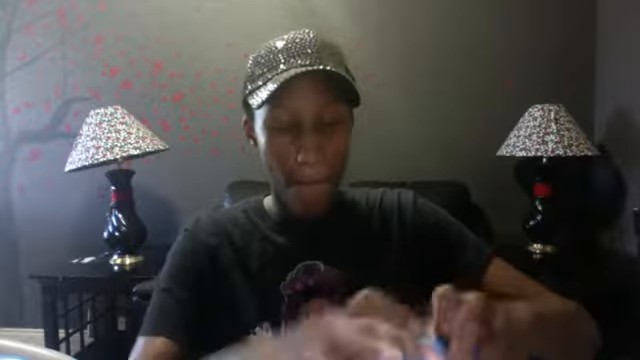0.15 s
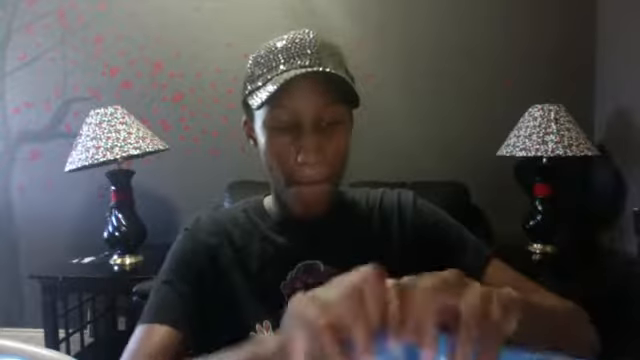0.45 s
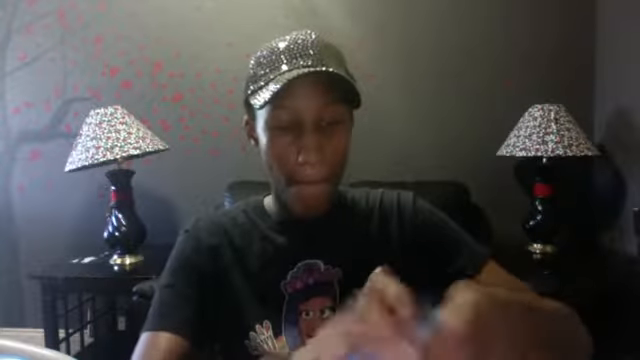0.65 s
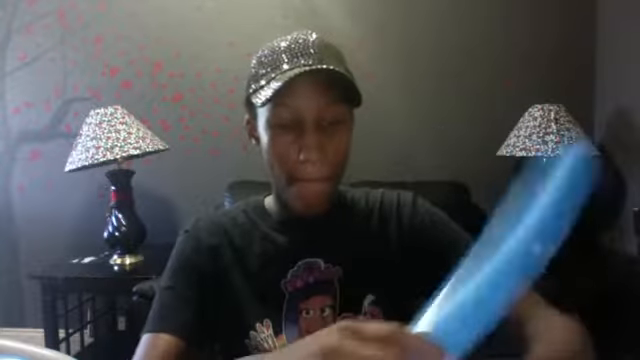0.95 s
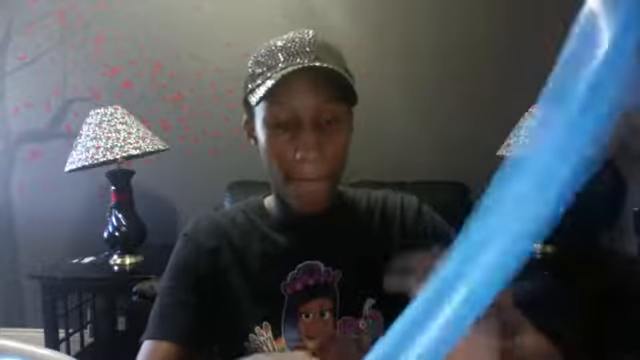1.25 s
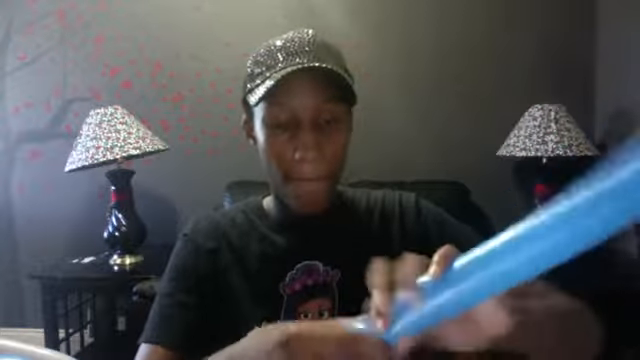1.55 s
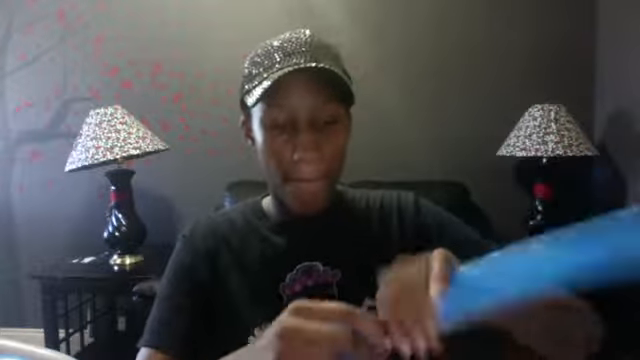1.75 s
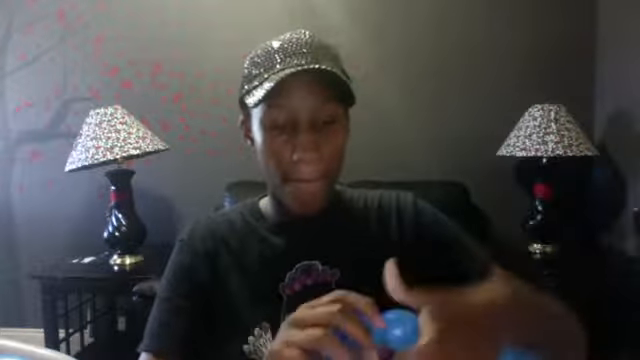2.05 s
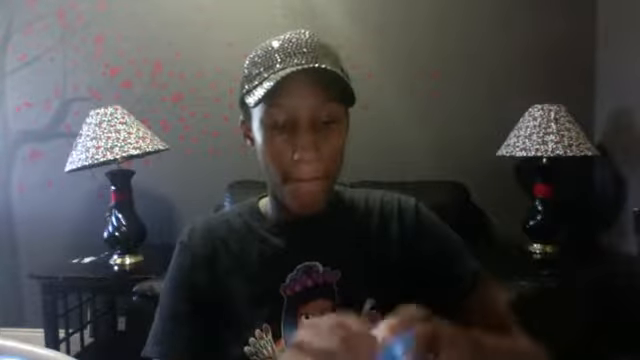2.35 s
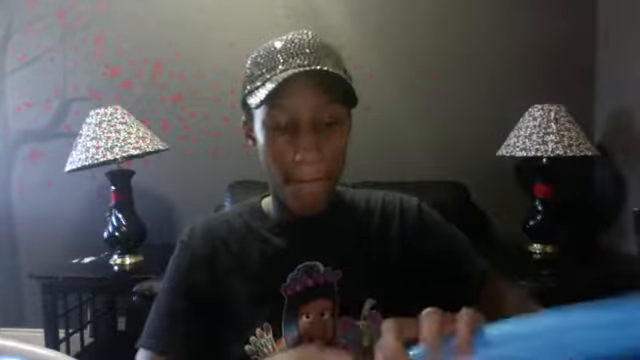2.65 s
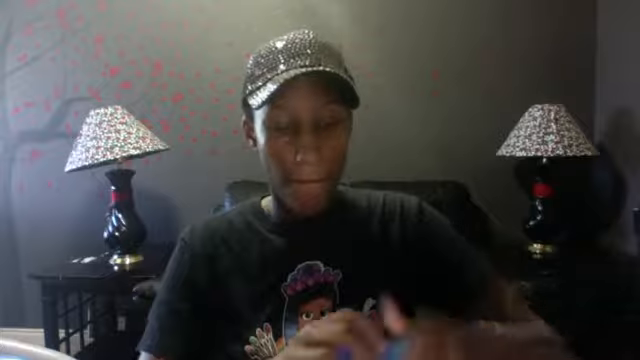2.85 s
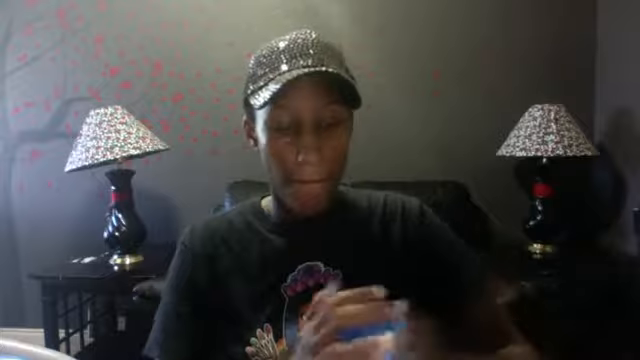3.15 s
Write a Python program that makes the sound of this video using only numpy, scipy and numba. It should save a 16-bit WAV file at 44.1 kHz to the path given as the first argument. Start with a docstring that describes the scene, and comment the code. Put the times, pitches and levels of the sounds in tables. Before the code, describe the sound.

Latex balloon being twisted by hand, with rubbery squeaks, creaks and sharp snaps in a small room.

```python
"""In a small room, a long latex balloon is squeezed and twisted by hand close to a microphone.
Fingers stick and slip on the rubber: each slip cracks, shakes the taut skin and rings the air inside.
Pulse trains drive coloured filters and resonances for the rubs and for sudden snaps of release.
Now and then the slips lock into a short gliding squeal, made of a sine and three overtones.
Changing room reflections surround the balloon, over a faint steady noise."""
import sys
import numpy as np
from scipy import signal
from scipy.fft import rfft, irfft
from scipy.io import wavfile
from scipy.ndimage import uniform_filter1d, minimum_filter1d, map_coordinates
from numba import njit

SR = 44100
rng = np.random.default_rng(int(sys.argv[2]) if len(sys.argv) > 2 else 0)


def generate_wav(sig):
    """Save sig (samples, or channels by samples) to the path in sys.argv[1] as 16-bit PCM at SR."""
    pcm = np.round(np.clip(np.atleast_2d(sig).T, -1, 1) * 32767).astype(np.int16)
    wavfile.write(sys.argv[1], SR, pcm)


N = 145530  # samples, 3.3 s


def undb(db):
    """Decibels to amplitude ratio: 20 dB is a factor of ten."""
    return 10 ** (np.asarray(db) / 20)


def unit(h):
    """Energy normalisation: the squares sum to 1."""
    return h / np.sqrt(np.sum(h ** 2))


def through(x, h):
    """Linear filtering: convolution with a response, cut to the input's length."""
    return signal.fftconvolve(x, h)[:len(x)]


def walk(n, hz):
    """Band-limited chance: straight lines between normal draws, hz per second, with a spread near 1."""
    count = 1000
    knots = rng.standard_normal(count)
    return np.sqrt(3 / 2) * np.interp(np.arange(n) * hz / SR, np.arange(count), knots)


def colour(points):
    """Minimum phase: folding the cepstrum gives a causal response with the given (Hz, dB) shape."""
    hz, db = np.array(points, float).T
    size = 2048
    bins_hz = np.arange(size // 2 + 1) * SR / size
    gain = undb(np.interp(np.log(bins_hz + 1), np.log(hz), db))
    cepstrum = irfft(np.log(gain))
    cepstrum[1:size // 2] *= 2
    cepstrum[size // 2 + 1:] = 0
    return unit(irfft(np.exp(rfft(cepstrum))))


def add(out, start, x):
    """Superposition: mix x into out from start in seconds, cut at the end of the scene."""
    i = max(int(start * SR), 0)
    out[..., i:i + x.shape[-1]] += x[..., :max(N - i, 0)]


RATE_WANDER, WANDER_HZ, SLIP_JITTER = 0.3, 70.1, 0.13  # spreads of the log slip rate
SLIP_SCATTER_DB = 0.5
TEAR_S, TEAR_SHARE = 0.00076, 0.78  # hiss of the contact after each slip


def slips(n, rate):
    """Stick-slip friction: uneven pulses at a wandering rate, each trailed by a tiny hiss; rms near 1."""
    hz = rate * np.exp(RATE_WANDER * walk(n, WANDER_HZ) + SLIP_JITTER * walk(n, rate))
    phase = np.cumsum(hz) / SR
    at = np.flatnonzero(np.diff(np.floor(phase), prepend=-1))  # one slip per whole cycle
    scatter = np.clip(rng.standard_normal(400), -2, 2)
    pulses = np.zeros(n)
    pulses[at] = undb(SLIP_SCATTER_DB * np.resize(scatter, len(at)))
    tear_envelope = through(pulses, np.exp(-np.arange(n) / SR / TEAR_S))
    tear = tear_envelope * rng.standard_normal(SR)[:n]
    x = unit(pulses - pulses.mean()) + TEAR_SHARE * unit(tear)
    return x / np.sqrt(uniform_filter1d(x ** 2, SR // 50) + 1e-12)  # even out over 20 ms


# Strokes of the fingers. Each row: start in seconds, length before release in seconds, attack in seconds,
# nominal slips per second, then drive of thud, air ring, skin and crackle in dB before the trim.
RUB_STROKES = [(0, 0.037, 0.0017, 500, -49, -36, -23.5, -24),
               (0.074, 0.069, 0.018, 850, -42, -30, -18.5, -22),
               (0.159, 0.053, 0.022, 700, -66, -31.5, -20.5, -18.5),
               (0.225, 0.067, 0.0058, 300, -41, -31.5, -25.5, -23),
               (0.307, 0.039, 0.005, 500, -43, -29, -29, -26),
               (0.381, 0.031, 0.0022, 900, -42, -34.5, -27, -20.5),
               (0.406, 0.075, 0.0046, 450, -46, -30.5, -22, -21.5),
               (0.506, 0.04, 0.0041, 300, -35, -27, -22, -23),
               (0.555, 0.093, 0.007, 250, -44, -39.5, -26, -32.5),
               (0.605, 0.053, 0.0033, 350, -33, -26, -25.5, -23.5),
               (0.668, 0.023, 0.0038, 330, -31.5, -22, -20, -22),
               (0.711, 0.033, 0.004, 450, -31, -27, -21, -24),
               (0.783, 0.038, 0.0027, 220, -32, -20.5, -26.5, -28),
               (0.859, 0.081, 0.01, 370, -53, -26, -20, -24.5),
               (0.984, 0.11, 0.02, 550, -49, -28.5, -27, -39),
               (1.043, 0.036, 0.0072, 300, -43, -25, -21, -21.5),
               (1.095, 0.012, 0.0024, 460, -67, -35, -16, -51),
               (1.251, 0.011, 0.0045, 220, -73, -60, -56.5, -48.5),
               (1.295, 0.14, 0.0061, 365, -46, -28, -18, -21.5),
               (1.517, 0.1, 0.005, 600, -44, -40.5, -24.5, -25),
               (1.597, 0.052, 0.0054, 500, -51, -37, -22.5, -23.5),
               (1.664, 0.077, 0.003, 600, -74, -78, -46, -35.5),
               (1.766, 0.11, 0.0089, 1000, -54, -60, -28.5, -31.5),
               (1.886, 0.062, 0.011, 350, -43, -29.5, -21.5, -21.5),
               (1.952, 0.076, 0.0037, 200, -35, -31, -25.5, -25),
               (2.047, 0.014, 0.0026, 420, -23, -23.5, -19, -14.5),
               (2.077, 0.03, 0.005, 420, -32, -27.5, -27, -26.5),
               (2.182, 0.026, 0.005, 400, -50.5, -24.5, -35.5, -57),
               (2.268, 0.077, 0.0062, 380, -63, -28, -25, -27),
               (2.366, 0.085, 0.0082, 600, -36, -25.5, -17.5, -16.5),
               (2.456, 0.057, 0.005, 500, -49, -38.5, -28, -36),
               (2.555, 0.074, 0.0091, 700, -45, -25, -14.5, -12),
               (2.612, 0.051, 0.0028, 850, -35.5, -22.5, -14, -10.5),
               (2.67, 0.12, 0.005, 400, -44.5, -32.5, -23, -25.5),
               (2.8, 0.062, 0.019, 550, -42, -27, -15.5, -15.5),
               (2.873, 0.049, 0.0087, 850, -48, -33, -19, -16.5),
               (2.921, 0.083, 0.014, 690, -45, -32, -17, -16.5),
               (3.012, 0.041, 0.0022, 400, -36, -30, -25.5, -31),
               (3.083, 0.024, 0.011, 300, -37, -21, -19.5, -32.5),
               (3.119, 0.05, 0.011, 280, -36, -29, -22.5, -25.5),
               (3.186, 0.039, 0.0076, 600, -65, -29.5, -21, -29),
               (3.265, 0.026, 0.0065, 250, -43, -35.5, -102, -69)]
# Trim of the rubs' drive. The values: thud, air ring, skin, crackle, each in dB.
RUB_TRIM_DB = [0.76, 0.35, -0.083, 0.49]
GRIP_DB, GRIP_HZ = 1.5, 108.4  # the grip tightens and loosens
RELEASE_S = 0.0065


def rubs():
    """Friction-driven excitation: each stroke grips, chatters and lets go, driving four parts."""
    out = np.zeros((4, N))
    for start, length, attack, rate, *db in RUB_STROKES:
        t = np.arange(int((length + 5 * RELEASE_S) * SR)) / SR
        grip = undb(GRIP_DB * walk(len(t), GRIP_HZ))
        grip = grip / np.sqrt(np.mean(grip ** 2))
        envelope = np.minimum(t / attack, 1) * np.exp(-np.maximum(t - length, 0) / RELEASE_S)
        level = undb(np.add(db, RUB_TRIM_DB))[:, None]
        add(out, start, level * envelope * grip * slips(len(t), rate))
    return out


@njit
def resonate(x, hz, width):
    """Resonance: a state-variable band-pass of fixed width in Hz with a moving centre."""
    y, band, low = np.empty(len(x)), 0., 0.
    for i in range(len(x)):
        g = np.tan(np.pi * hz[i] / SR)
        damping = width / hz[i]
        v = (band + g * (x[i] + 1e-18 - low)) / (1 + g * (g + damping))
        band = 2 * v - band
        low = low + 2 * g * v
        y[i] = damping * v
    return y


# Resonances of the stretched skin by the fingers.
# Each row: centre at rest tension in Hz, width in Hz, relative strength.
SKIN_PATCH = [(1450, 43, 0.27), (2134, 420, 0.63), (2628, 270, 0.79), (3334, 300, 1), (4180, 900, 1)]
TENSION_SWING, TENSION_HZ, PATCH_SHARE = 0.17, 40.05, 0.28  # swing is in log frequency


def stretched(x):
    """Membrane tension: resonances glide together as it changes, and each drifts a little alone."""
    tension = walk(N, TENSION_HZ)
    y = np.zeros(N)
    for hz, width, strength in SKIN_PATCH:
        drift = tension + 0.5 * walk(N, TENSION_HZ)
        y += strength * resonate(x, hz * np.exp(TENSION_SWING * drift), 1. * width)
    mixed = (1 - PATCH_SHARE) * unit(x) + PATCH_SHARE * unit(y)
    return np.sqrt(np.sum(x ** 2)) * unit(mixed)  # keeps the energy of x


# a slip returns from the fingers' edge, whose distance wanders
BOUNCE_S, BOUNCE_SWING, BOUNCE_HZ, BOUNCE_SHARE = 0.000355, 0.465, 45.25, 0.29


def bounced(x):
    """Comb interference: each slip meets its own inverted reflection in the rubber at a shifting delay."""
    lag = BOUNCE_S * np.exp(BOUNCE_SWING * walk(N, BOUNCE_HZ))
    echo = map_coordinates(x, [np.arange(N) - lag * SR], order=3)
    return (x - BOUNCE_SHARE * echo) / np.hypot(1, BOUNCE_SHARE)


# Colours of the four parts: low thud, air inside, taut skin, bright crackle.
# Each row: frequency in Hz, relative level in dB.
THUD_COLOUR = [(30, -11.5), (80, -10.5), (120, -3), (165, -1), (220, -1.5), (330, -4), (430, -8.5),
               (900, -63), (16000, -80)]
AIR_COLOUR = [(30, -62), (250, -32.5), (420, -10.5), (560, -6.5), (730, 0.5), (950, -7.5), (1300, -8),
              (2200, -36.5), (16000, -95)]
SKIN_COLOUR = [(30, -65), (450, -56.5), (800, -20), (1150, -7.5), (1700, 1), (2250, 3), (3000, 0),
               (3700, -6), (4600, -7.5), (6000, -15), (9000, -26), (16000, -51.5)]
CRACKLE_COLOUR = [(30, -71), (1000, -64.5), (2200, -29.5), (4500, 1), (5600, -1), (7800, -2.5), (9200, 0),
                  (11300, 0), (14000, -4.5), (17000, -20.5)]
# Modes of the air column and skin that ring on. Each row: frequency in Hz, relative strength.
RING_MODES = [(738, 0.58), (1518, 0.09), (1696, 0.082), (1852, 0.47), (2207, 0.75), (2400, 0.24),
              (2681, 0.32), (3150, 0.18)]
FLICKER_DB, FLICKER_HZ = 1, 86.27  # each part also flutters alone
COLUMN_HZ, COLUMN_WIDTH_HZ, COLUMN_GAIN = 163, 23.5, 0.67  # low boom of the long air column
RING_DB, RING_T60_S, FREE_S = -32.5, 0.2, 0.11  # the fingers stop the ring by FREE_S
LET_GO_S, LET_GO_DB = 0.94, -24  # the hand opens and the balloon rings freely


def balloon(drive):
    """Source and resonator: slips take four colours, and damped modes ring on after them."""
    colours = (THUD_COLOUR, AIR_COLOUR, SKIN_COLOUR, CRACKLE_COLOUR)
    parts = []
    for part, shape in zip(drive, colours):
        flicker = undb(FLICKER_DB * walk(N, FLICKER_HZ))
        parts.append(through(part * flicker, colour(shape)))
    thud, air, skin, crackle = parts
    boom = COLUMN_GAIN * resonate(thud, np.full(N, 1. * COLUMN_HZ), 1. * COLUMN_WIDTH_HZ)
    x = thud + boom + air + stretched(skin) + bounced(crackle)
    t = np.arange(SR // 3) / SR
    decay = np.exp(-np.log(1000) * t / RING_T60_S)
    stopped = np.clip(1 - (t / FREE_S) ** 2, 0, 1)
    ring = decay * stopped * sum(g * np.sin(2 * np.pi * hz * t) for hz, g in RING_MODES)
    out = x + undb(RING_DB) * through(x, unit(ring))
    early_rms = np.sqrt(np.mean(ring[:SR // 100] ** 2))  # first 10 ms
    add(out, LET_GO_S, undb(LET_GO_DB) * ring / early_rms)
    return out


EARLY_DB, EARLY_S = -1, 0.0025  # energy of the early reflections and their decay constant
ROOM_DB, ROOM_T60_S, ROOM_TREBLE_T60_S = -4.5, 0.19, 0.17  # energy of the tail, decay times by 60 dB


def room():
    """Reverberation: reflections from table and chest, then a short tail whose treble dies first."""
    t = np.arange(SR // 3) / SR
    near, far, far_treble = rng.standard_normal((3, len(t)))
    low = signal.sosfilt(signal.butter(2, 4000, fs=SR, output="sos"), far)
    high = signal.sosfilt(signal.butter(2, 4000, "high", fs=SR, output="sos"), far_treble)
    low = low * np.exp(-np.log(1000) * t / ROOM_T60_S)
    high = high * np.exp(-np.log(1000) * t / ROOM_TREBLE_T60_S)
    early = near * np.exp(-t / EARLY_S) * (t > 0.0007)
    tail = (low + high) * (t > 0.005)
    return undb(EARLY_DB) * unit(early) + undb(ROOM_DB) * unit(tail)


MOVE_S = 0.11


def reflections(x):
    """Time-varying reflection: hands and balloon move, so overlapping stretches get new responses."""
    out, t = np.zeros(N), np.arange(N) / SR
    for centre in np.arange(0, N / SR + MOVE_S, MOVE_S):
        at = np.flatnonzero(np.abs(t - centre) < MOVE_S)
        window = np.cos(np.pi / 2 * (t[at] - centre) / MOVE_S)  # equal-power crossfade
        add(out, at[0] / SR, signal.fftconvolve(x[at] * window, room()))
    return out


# Colour of the background noise. Each row: frequency in Hz, relative level in dB.
FLOOR_COLOUR = [(30, 25), (150, -17), (600, 5), (2500, -25), (14000, -19)]
FLOOR_DB = -71.5


def background():
    """Stationary noise: white noise filtered to a fixed, mostly low colour."""
    return undb(FLOOR_DB) * through(rng.standard_normal(N), colour(FLOOR_COLOUR))


# Sudden releases of the grip.
# Each row: start in seconds, then drive of air ring, skin and crackle in dB before the trim.
GRIP_RELEASES = [(0.044, -11, -12, -14.5), (0.158, -32, -15.5, -14), (0.283, -45, -24, -21),
                 (0.31, -44, -16, -15.5), (0.338, -40, -17, -34), (0.378, -48, -14, -14.5),
                 (0.419, -49, -17, -9), (0.495, -49, -25, -16.5), (0.515, -35, -14, -27),
                 (0.533, -34, -18, -26), (0.611, -17, -10.5, -13.5), (0.649, -20.5, -13, -30),
                 (0.67, -23, -17, -35), (0.682, -15, -9, -22), (0.71, -31, -13, -17),
                 (0.787, -21, -14.5, -42), (0.807, -32, -19, -21), (0.829, -39, -13, -21),
                 (0.897, -22, -34, -20), (0.931, -17, -23, -21), (0.974, -19.5, -13, -28),
                 (1.098, -23, -24, -24.5), (1.299, -17.5, -14, -11), (1.499, -27.5, -4.5, -6.5),
                 (1.576, -23.5, -14, -18.5), (1.668, -76.5, -15, -19.5), (1.75, -60, -39, -9.5),
                 (1.796, -34.5, -13, -18), (1.864, -53, -33, -25.5), (1.895, -48, -25, -16),
                 (1.937, -22, -12, -20), (1.992, -19.5, -16, -34), (2.016, -20, -30, -23),
                 (2.044, -15, -21, -15.5), (2.183, -18, -17.5, -16.5), (2.282, -11, -15, -15),
                 (2.308, -11.5, -15.5, -17), (2.364, -16.5, -13.5, -10), (2.444, -39, -17, -37),
                 (2.908, -12, -32, -18), (3.076, -26, -22, -34), (3.123, -34, -11, -35),
                 (3.188, -41, -15, -22.5)]
# Trim of the snaps' drive. The values: thud, air ring, skin, crackle, each in dB.
SNAP_TRIM_DB = [0, 0.033, 0.73, 2.7]
SNAP_THUD_DB = -20  # thud against air ring, before the trim
SNAP_ATTACK_S, SNAP_HOLD_S, SNAP_DECAY_S, SNAP_RATE_HZ = 0.00033, 0.0026, 0.0019, 900


def snaps():
    """Sudden release of strain: a few fast slips as the rubber jumps free."""
    out, t = np.zeros((4, N)), np.arange(SR // 20) / SR
    envelope = np.minimum(t / SNAP_ATTACK_S, 1) * np.exp(-np.maximum(t - SNAP_HOLD_S, 0) / SNAP_DECAY_S)
    for start, air, skin, crackle in GRIP_RELEASES:
        db = [air + SNAP_THUD_DB, air, skin, crackle]
        level = undb(np.add(db, SNAP_TRIM_DB))[:, None]
        add(out, start, level * envelope * slips(len(t), SNAP_RATE_HZ))
    return out


# Short squeals. Each row: start in seconds, length in seconds, nominal first pitch in Hz, nominal last
# pitch in Hz, nominal level of the fundamental in dB, step per overtone in dB (above 0 counts as 0).
SQUEAL_GLIDES = [(.092, 0.015, 2030, 1950, -26, -6), (0.115, 0.016, 1645, 1760, -23, 4),
                 (.183, 0.012, 1400, 1480, -19.5, 6), (.206, 0.0099, 560, 600, -18.5, -10),
                 (0.329, 0.015, 2000, 2170, -20, -7), (0.678, 0.015, 785, 653, -22, -17),
                 (0.98, 0.058, 1003, 1200, -22, -9), (0.999, 0.038, 1206, 752, -21, -9),
                 (1.093, 0.034, 711, 765, -17.5, -7.5), (1.494, 0.0148, 2450, 3150, -15.5, -16),
                 (1.797, 0.0075, 2130, 3330, -12, -19), (2.050, 0.058, 437, 413, -25, -15),
                 (2.046, 0.044, 2130, 2230, -20, -21), (1.746, 0.0113, 3000, 2600, -19, -13),
                 (2.201, 0.046, 730, 1044, -30, -26), (2.226, .040, 1088, 960, -31, -6.5),
                 (2.61, 0.0104, 4780, 2720, -10, -18), (2.884, 0.015, 983, 855, -12.5, -1.5),
                 (2.904, 0.028, 850, 760, -18.5, -26), (2.933, 0.03, 659, 687, -14.5, -6),
                 (2.958, 0.035, 699, 694, -11, -12), (3.12, 0.013, 567, 553, -18, -23),
                 (3.186, 0.0072, 1486, 1510, -13, -3), (3.204, 0.019, 536, 692, -24.5, 0)]
SQUEAL_WOBBLE, SQUEAL_ROUGH_DB = 0.0093, 2.5  # spreads of relative pitch and of level


def squeals():
    """Self-sustained oscillation: the slips lock to a pitch that glides with the tension."""
    out = np.zeros(N)
    for start, length, first, last, db, step_db in SQUEAL_GLIDES:
        n = int(length * SR)
        hz = np.geomspace(first, last, n) * (1 + SQUEAL_WOBBLE * walk(n, 200))
        phase = 2 * np.pi * np.cumsum(hz) / SR
        tone = np.zeros(n)
        for k in range(4):
            strength = undb(min(step_db, 0) * k) / np.sqrt(max(k, 1))  # upper ones weaken further
            tone += strength * np.sin((k + 1) * phase)
        level = np.sqrt(2) * undb(db + SQUEAL_ROUGH_DB * walk(n, 405.5))
        add(out, start, level * signal.windows.tukey(n, 0.5) * tone)
    return out


SQUEAL_WET = 0.84  # share of the squeals sent to the reflections


def scene():
    """Superposition: direct sound and reflections, scaled by their joint energy, over the noise."""
    rubber, squeal = balloon(rubs() + snaps()), squeals()
    reflected = reflections(rubber + SQUEAL_WET * squeal)
    energy = 1 + undb(EARLY_DB) ** 2 + undb(ROOM_DB) ** 2
    heard = (rubber + squeal + reflected) / np.sqrt(energy)
    return (heard + background())[None]


TOP_HZ, CEILING, LIMIT_S = 14150, 0.8, 0.001


def record(dry):
    """Peak limiting: a fast look-ahead gain holds down the loudest peaks; the top is cut before and after."""
    cut = signal.ellip(8, 0.1, 50, TOP_HZ, fs=SR, output="sos")
    x, size = signal.sosfiltfilt(cut, dry), int(LIMIT_S * SR)
    needed = CEILING / np.maximum(np.abs(x), CEILING)
    gain = uniform_filter1d(minimum_filter1d(needed, 2 * size), size)
    return signal.sosfiltfilt(cut, x * uniform_filter1d(gain, size))


dry = scene()
out = record(dry)
generate_wav(out)
```